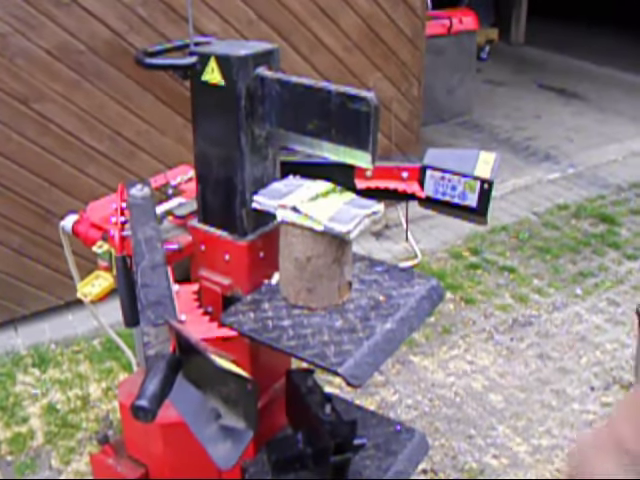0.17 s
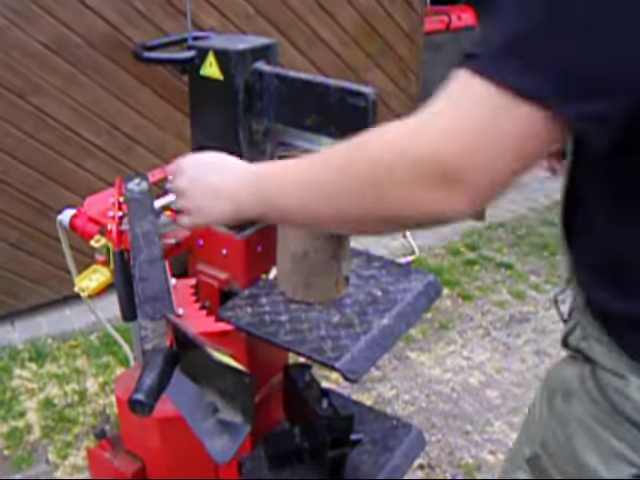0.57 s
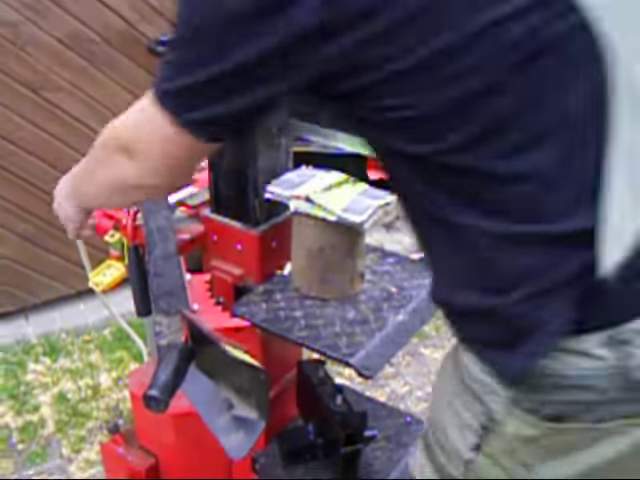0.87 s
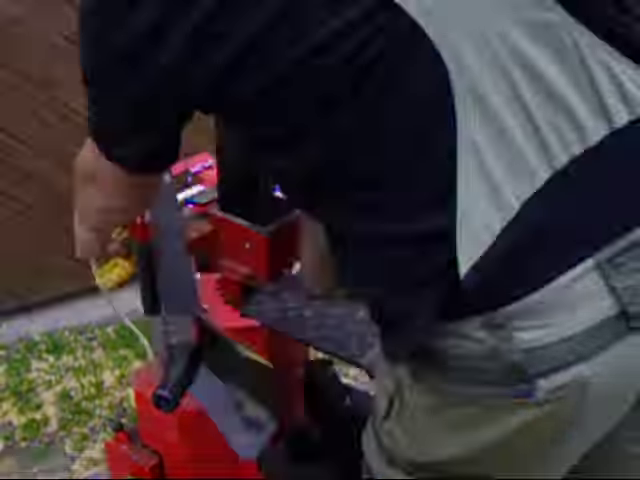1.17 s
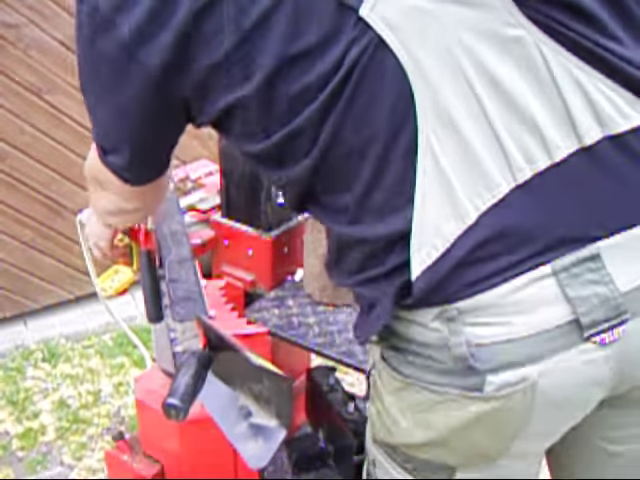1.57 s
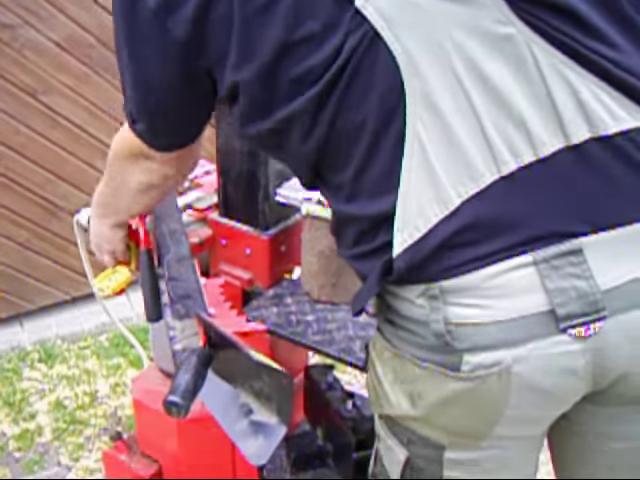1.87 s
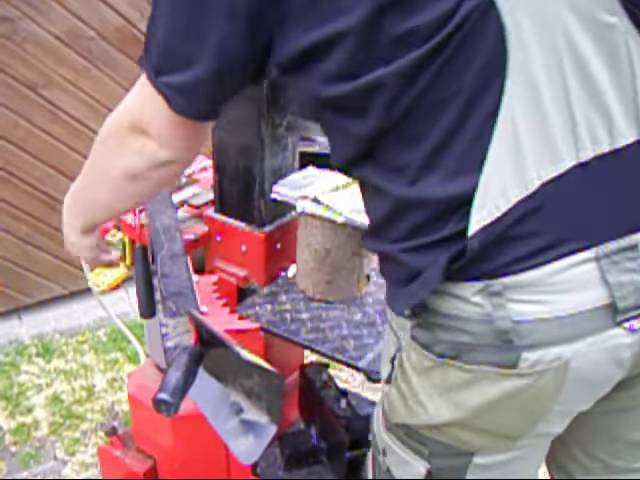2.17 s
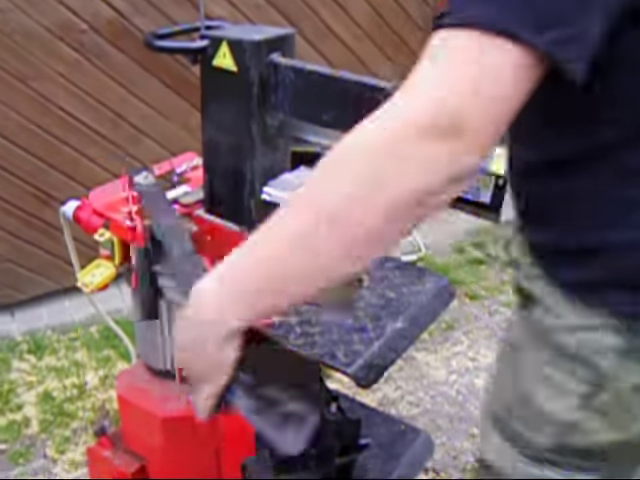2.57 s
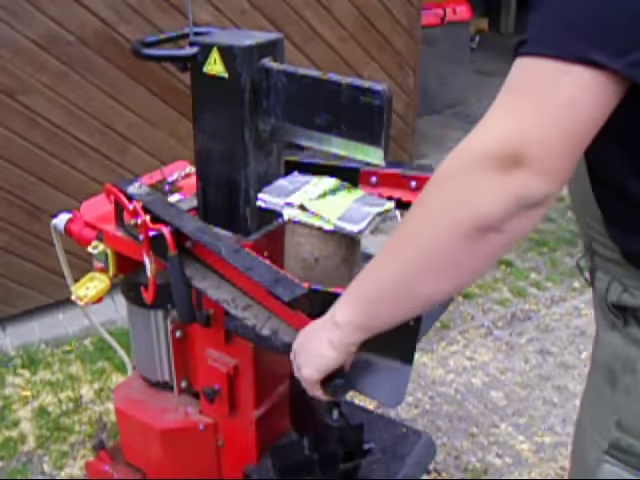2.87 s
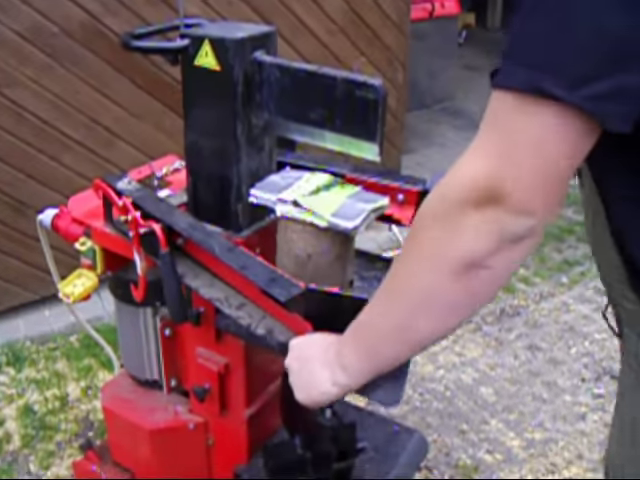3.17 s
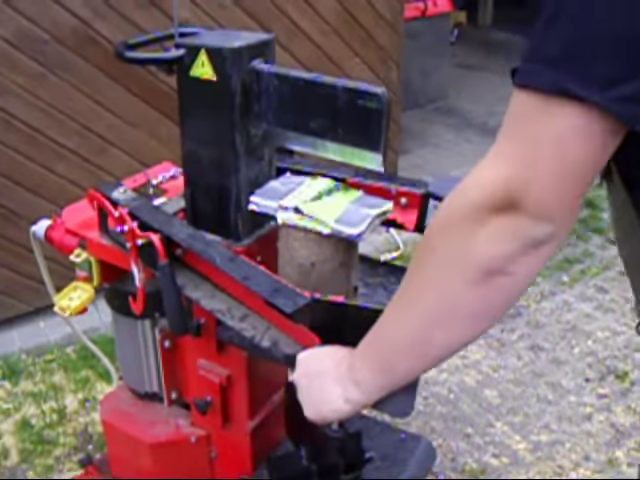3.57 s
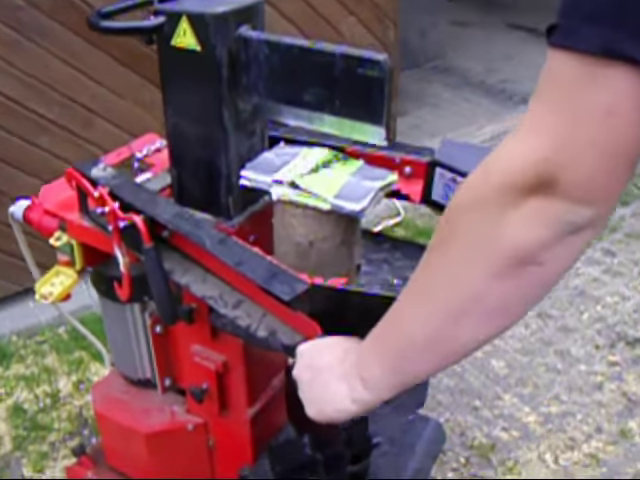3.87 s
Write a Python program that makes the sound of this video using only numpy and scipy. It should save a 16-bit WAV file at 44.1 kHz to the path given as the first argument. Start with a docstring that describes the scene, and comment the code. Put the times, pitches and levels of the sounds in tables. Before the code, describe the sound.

Electric log splitter motor kicks in and drones, then its metal lever slams against the stop.

```python
"""An electric log splitter in a yard. Faint wind, a far hum and birds; the sound cuts out at 1.2 s.
At 1.8 s the frame shudders, the motor starts and its gear pump hums. A second dropout ends in a pop
and a steel clink; a tick and rattles follow. At 3.2 s the lever slams against its stop, then the pump
labours and the frame rattles; last comes a thin, high chirp, probably a bird. All is sampled at 8 kHz
and held, which mirrors the sound into the treble."""
import sys
import numpy as np
from scipy import signal
from scipy.fft import rfft, irfft
from scipy.io import wavfile

SR = 44100
rng = np.random.default_rng(int(sys.argv[2]) if len(sys.argv) > 2 else 0)


def file_out(sig):
    """Save sig as 16-bit WAV at sys.argv[1]."""
    # one column per channel
    cols = np.atleast_2d(sig).T
    # limit, then scale
    lim = np.clip(cols, -1, 1)
    pcm = np.round(lim * 32767).astype(np.int16)
    wavfile.write(sys.argv[1], SR, pcm)


N = 176400
T = np.arange(N) / SR


def amp(db):
    """Decibels to gain."""
    return 10 ** (np.asarray(db) / 20)


def unit(x):
    """Scale to unit rms."""
    return x / np.sqrt(np.mean(x ** 2) + 1e-20)


def level(points):
    """Gain curve through (t/s, level/dB) points."""
    return amp(np.interp(T, *np.transpose(points)))


def noise(spectrum):
    """Unit-rms noise shaped by (f/Hz, relative density/dB) points."""
    hz, db = np.transpose(spectrum)
    bins_hz = np.fft.rfftfreq(N, 1 / SR)
    gain = amp(np.interp(np.log(bins_hz + 1), np.log(hz), db))
    return unit(irfft(rfft(rng.standard_normal(N)) * gain, N))


def drift(rate_hz):
    """Random wander of about unit size."""
    knots = rng.standard_normal(400)
    return np.interp(T * rate_hz, np.arange(len(knots)), knots)


def decay(start_s, t60_s):
    """Silence, then an exponential fall from one."""
    return (T >= start_s) * np.exp(-np.log(1000) * np.maximum(T - start_s, 0) / t60_s)


def sine(cycles):
    """Sine with a random starting phase."""
    return np.sin(2 * np.pi * (cycles + rng.random()))


def ring(start_s, modes):
    """Damped modes struck together."""
    return sum(amp(db) * decay(start_s, t60_s) * sine(hz * (T - start_s)) for hz, db, t60_s in modes)


def lowpass(x, hz, taps):
    """Steep linear-phase low-pass."""
    return signal.oaconvolve(x, signal.firwin(taps, hz, window=("kaiser", 8), fs=SR), "same")


def yard():
    """Steady outdoor wash, wind gusts on the microphone and a far hum."""
    # outdoor wash: f/Hz, relative density/dB
    wash_spectrum = [(40, -12.5), (110, -6), (230, -8.5), (400, -9), (600, -10), (800, -12.5),
                     (1200, -12.5), (2000, -16), (2600, -18), (3100, -21), (4000, -23)]
    # wind: f/Hz, relative density/dB
    wind_spectrum = [(15, -3), (50, 0.5), (90, -2.5), (200, -23), (600, -47.5)]
    # wind strength: t/s, level/dB
    gusts = [(0, -32), (.12, -51), (.27, -40.5), (.42, -41.5), (.5, -47.5), (.72, -44.5), (1.1, -54),
             (1.7, -57.5), (2.5, -46), (3.2, -48), (4, -49)]
    # far hum: f/Hz, rms level/dB
    hum_tones = [(479.1, -53.5), (511.4, -57.5), (958.2, -62.5), (990.5, -56.5)]
    wash_db, flutter_db = -40, 2.5
    wash = amp(wash_db) * noise(wash_spectrum)
    wind = level(gusts) * amp(flutter_db * drift(rate_hz=20)) * noise(wind_spectrum)
    hum = sum(np.sqrt(2) * amp(db) * np.sin(2 * np.pi * hz * T + 0.69 * drift(rate_hz=7.9))
              for hz, db in hum_tones)
    return wash + wind + hum


def birds():
    """Distant chirps: short, warbling sine glides."""
    # chirps: t/s, length/s, start f/Hz, end f/Hz, level/dB
    chirps = [(.17, .06, 2580, 2620, -54), (.27, .14, 3750, 3430, -54), (.54, .1, 3620, 3830, -57),
              (1.02, .18, 3720, 3660, -56.5)]
    warble_hz = 50
    song = np.zeros(N)
    for start_s, length_s, from_hz, to_hz, db in chirps:
        progress = np.clip((T - start_s) / length_s, 0, 1)
        hz = from_hz + (to_hz - from_hz) * progress + warble_hz * drift(rate_hz=95)
        envelope = amp(db) * (1 + 0.53 * drift(rate_hz=60)) * np.sin(np.pi * progress)
        song += envelope * np.sin(2 * np.pi * np.cumsum(hz) / SR)
    return song


def dropouts(x):
    """The sound cuts out twice and returns the second time with a pop."""
    # gaps: off t/s, on t/s
    gaps = [(1.221, 1.473), (2.237, 2.4905)]
    mute_db, pop_height, pop_s = -21, 0.38, .0015
    for off_s, on_s in gaps:
        x = x * np.where((T >= off_s) & (T < on_s), amp(mute_db) * decay(off_s, t60_s=.06), 1)
    pop_progress = (T - gaps[-1][1]) / pop_s
    return x + pop_height * (pop_progress >= 0) * (1 - np.clip(pop_progress, 0, 1) ** 4)


def frame():
    """The frame shudders as the motor starts and rattles around the lever's stroke."""
    # rattles: t/s, rise/s, t60/s, level/dB
    rattles = [(1.82, 0.048, 0.22, -12.5), (1.888, 0.016, 0.15, -25), (2.84, .02, .25, -22.5),
               (2.88, .01, .15, -23.5), (3.322, 0.01, 0.18, -20), (3.504, .035, .16, -15),
               (3.649, .02, 0.09, -20)]
    # frame response: f/Hz, relative density/dB
    spectrum = [(80, -26.5), (200, -17.5), (290, 2), (400, -7), (560, -2.5), (900, -1.5), (1100, -3.5),
                (1300, -19.5), (1700, -15.5), (2050, -16.5), (2300, -27.5), (4000, -27.5)]
    shake = np.zeros(N)
    for start_s, rise_s, t60_s, db in rattles:
        peak_s = start_s + rise_s
        attack = np.clip((T - start_s) / rise_s, 0, 1) ** 2 * (T < peak_s)
        shake += amp(db) * (attack + decay(peak_s, t60_s))
    return shake * noise(spectrum)


def motor_and_pump():
    """The shaft runs up and drives a gear pump: tooth tone, shaft harmonics, throbbing fan and oil rush."""
    # tooth tone: t/s, rms level/dB
    tooth_levels = [(1.85, -29), (2.03, -29), (2.2, -22), (2.55, -22.5), (2.75, -23.5), (3.0, -26),
                    (3.22, -28.5), (3.45, -30.5), (3.8, -32), (4, -40)]
    # pump lines: shaft multiple (rounded below), idle level/dB, loaded level/dB
    orders = [(13, -42, -43), (16, -53.5, -52), (21, -54, -44), (23, -53.5, -37), (24, -42, -48.5),
              (25, -44, -34), (28, -61.5, -49), (31, -49.5, -43), (32, -44.5, -37.5), (35, -43, -31),
              (36, -34, -30), (37, -36.5, -36.5), (38, -44.5, -63), (39, -40.5, -41), (40, -45, -45.5),
              (42, -50.5, -50), (44, -62, -48), (48, -45, -44.5), (58, -53, -40.5), (59, -46, -45.5),
              (60, -50, -47), (61, -48, -64), (62, -48, -36), (60.4, -60.5, -44), (62.7, -67, -54),
              (67, -60.5, -82), (71.14, -44.5, -41), (71.8, -47.5, -34.5), (73, -61, -55), (73.6, -57, -49),
              (84.7, -72.5, -52), (86.3, -64, -47), (97.4, -49.5, -56)]
    # gain on lines and rush: t/s, level/dB
    effort = [(1.85, 2), (2.04, -3.5), (2.2, -1.5), (2.58, 3), (2.75, 1), (3.2, 2), (3.45, -2), (3.7, -1.5),
              (3.85, 1), (4, -1.5)]
    # fan and oil rush, idle: f/Hz, relative density/dB
    idle_spectrum = [(40, -13.5), (110, -2), (170, -13), (290, 2), (440, -7), (600, 3.5), (700, -6),
                     (1000, -1.5), (1300, -7.5), (1700, -7.5), (2050, -11), (2450, -12), (3000, -14.5),
                     (4000, -15.5)]
    # fan and oil rush, loaded: f/Hz, relative density/dB
    loaded_spectrum = [(40, -29.5), (120, -5), (185, -13), (240, 3), (300, 4.5), (370, 5.5), (440, -11),
                       (570, -4.5), (950, -5.5), (1280, -7.5), (1700, -5), (2100, -14.5), (2450, -11.5),
                       (3000, -17.5), (4000, -18)]
    start_s, run_up_s, load_s, load_rise_s = 1.845, .06, 3.25, 0.033
    idle_hz, loaded_hz, teeth = 24.947, 24.93, 12
    idle_rush_db, loaded_rush_db, lines_db = -29.5, -25.5, -0.5
    jitter_cycles, waver, throb = 0.12, 0.29, 0.11

    running = np.clip((T - start_s) / run_up_s, 0, 1)
    load = np.clip((T - load_s) / load_rise_s, 0, 1)
    turns = np.cumsum(running * (idle_hz + (loaded_hz - idle_hz) * load)) / SR
    tooth_cycles = teeth * turns + load * jitter_cycles * drift(rate_hz=25)
    tooth = np.sqrt(2) * level(tooth_levels) * np.sin(2 * np.pi * tooth_cycles)
    lines = np.zeros(N)
    for order, idle_db, loaded_db in orders:
        gain = np.sqrt(2) * amp(lines_db + idle_db + (loaded_db - idle_db) * load)
        lines += gain * (1 + waver * drift(rate_hz=8.8)) * sine(round(order) * turns)
    rush = (1 - load) * amp(idle_rush_db) * noise(idle_spectrum)
    rush += load * amp(loaded_rush_db) * noise(loaded_spectrum)
    rush *= 1 + throb * np.sin(2 * np.pi * turns)
    return running * (tooth + level(effort) * (lines + rush))


def clink():
    """A steel part rings after a tap."""
    # steel modes: f/Hz, relative level/dB, t60/s
    modes = [(816, -2, 0.29), (1666, 0, 0.23), (2643, -16.5, 0.19)]
    return amp(-13.5) * ring(start_s=2.488, modes=modes)


def tick():
    """One short, dry noise burst."""
    # tick: f/Hz, relative density/dB
    spectrum = [(200, -18), (600, 9), (1200, -2), (2100, -10), (3000, -27), (4000, -16)]
    return amp(-14) * decay(start_s=2.632, t60_s=.016) * noise(spectrum)


def lever():
    """The lever slams against its stop and chatters; hard blows crack much more than soft ones."""
    # blows: t/s, relative level/dB
    blows = [(3.2448, 1.5), (3.2495, 0), (3.259, -6.5), (3.268, -5.5), (3.279, -11)]
    # lever and frame modes: f/Hz, relative level/dB, t60/s
    modes = [(236, -17, 0.088), (384, -10, 0.086), (695, -1.5, 0.076), (801.5, -2.5, 0.082),
             (880.5, 2, 0.083), (1099, -1.5, 0.11), (1158, -1, 0.085), (1590, -3, 0.075), (1690, -9, 0.056),
             (1960, -11, 0.034), (2460, -11, .04), (2543, -3, 0.059)]
    # impact crack: f/Hz, relative density/dB
    crack_spectrum = [(60, -12), (300, -15), (550, -6.5), (750, 4), (1150, 2), (1380, -4), (1800, 7),
                      (2600, -1.5), (3200, -3.5), (4000, -4.5)]
    ring_db, crack_db, crack_growth = -9, -1, 1.45
    clunk = np.zeros(N)
    for start_s, db in blows:
        clunk += amp(ring_db + db) * ring(start_s, modes)
        clunk += amp(crack_db + crack_growth * db) * decay(start_s, t60_s=.052) * noise(crack_spectrum)
    return clunk


def high_chirp():
    """A brief, thin, hissy chirp near 4 kHz, probably a bird."""
    # chirp hiss: f/Hz, relative density/dB
    spectrum = [(800, -29), (2000, 2), (3000, -5), (3700, -9), (3950, 6), (4200, -28)]
    peak_s, width_s, peak_db = 3.85, .055, -32
    return amp(peak_db) * np.exp(-((T - peak_s) / width_s) ** 2) * noise(spectrum)


def sample_and_hold(x):
    """Coarse sampling clips and holds each value, mirroring the sound into the treble."""
    rate_hz, band_hz, edge_hz = 8000, 4130, 11057
    instants_s = np.arange(N * rate_hz // SR) / rate_hz
    samples = np.interp(instants_s, T, lowpass(x, band_hz, taps=201))
    steps = np.repeat(np.clip(samples, -1, 1), 12)
    return lowpass(signal.resample(steps, N), edge_hz, taps=511)


def scene():
    """Yard and machine, mono."""
    mix = yard() + birds() + frame() + motor_and_pump() + clink() + tick() + lever() + high_chirp()
    return mix[None]


def record(dry):
    """Dropouts, then coarse sampling."""
    return sample_and_hold(dropouts(dry[0]))[None]


dry = scene()
out = record(dry)
file_out(out)
```